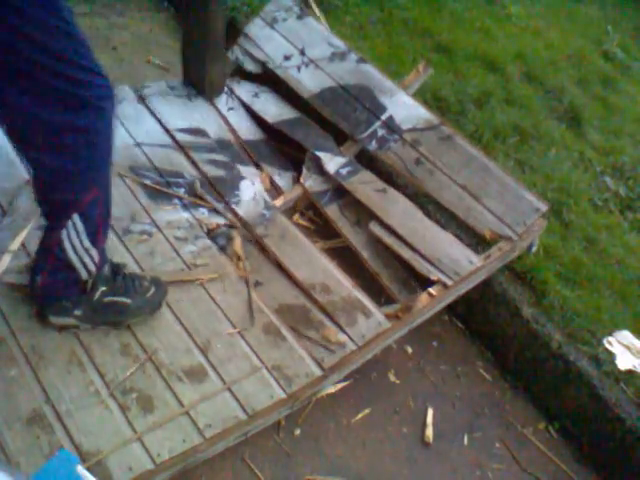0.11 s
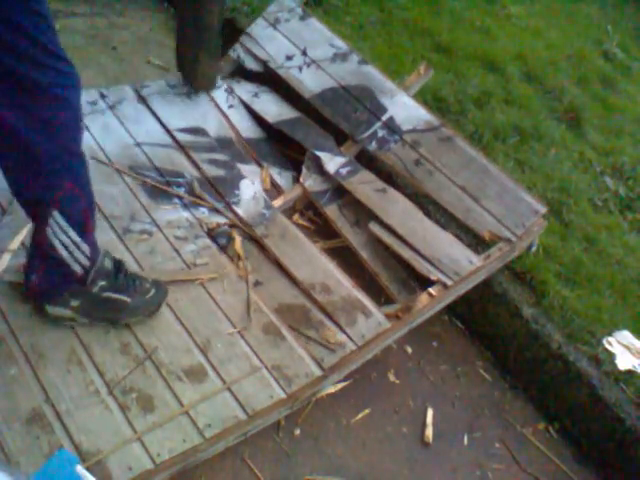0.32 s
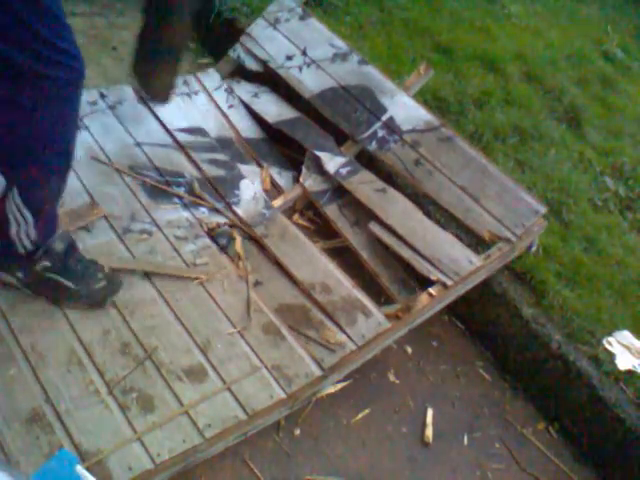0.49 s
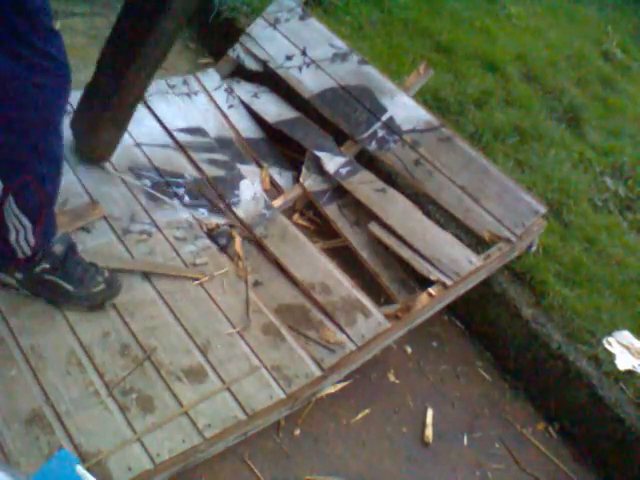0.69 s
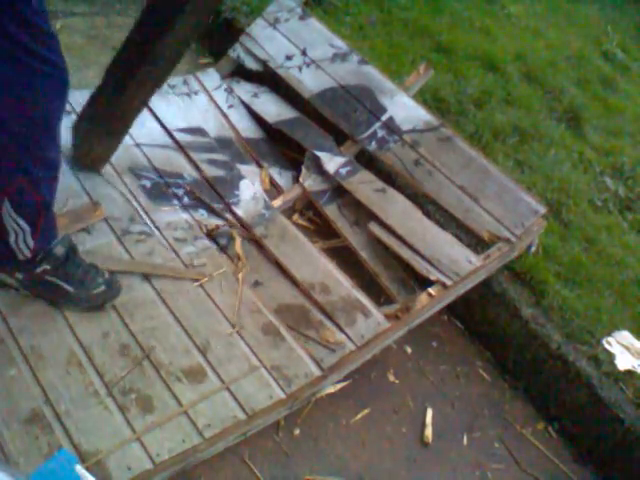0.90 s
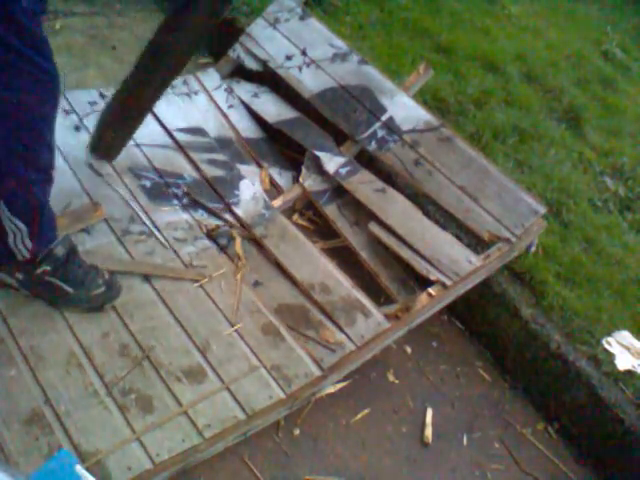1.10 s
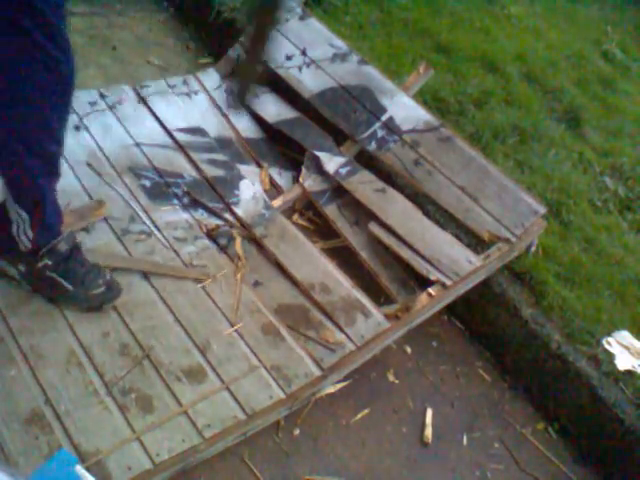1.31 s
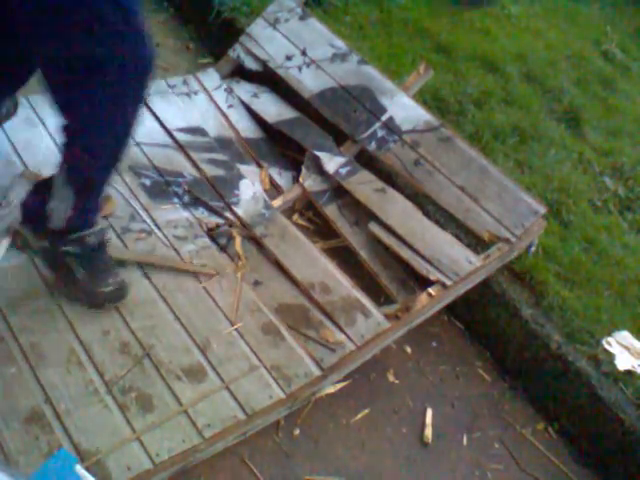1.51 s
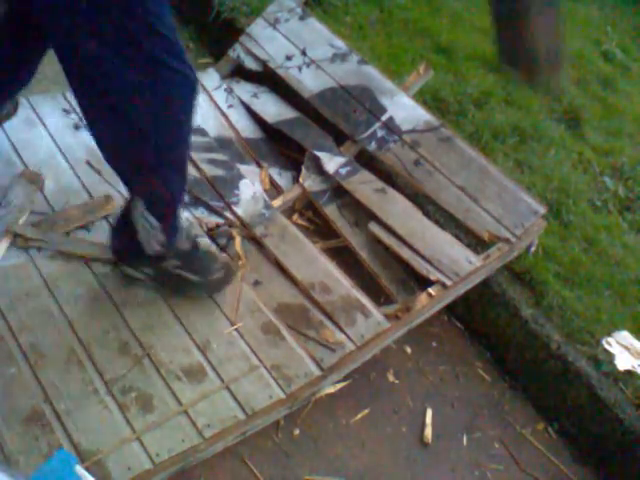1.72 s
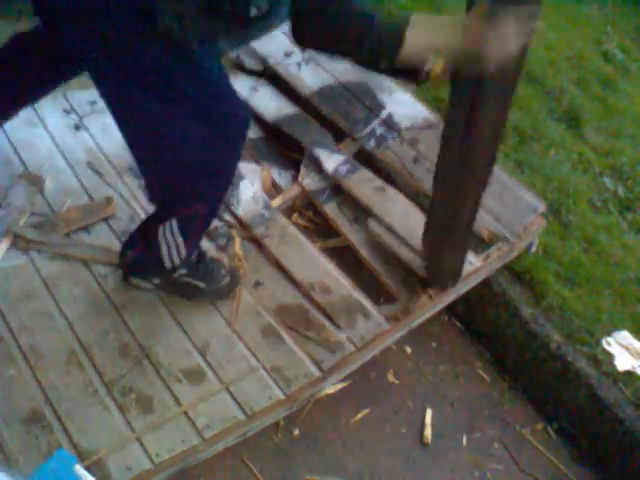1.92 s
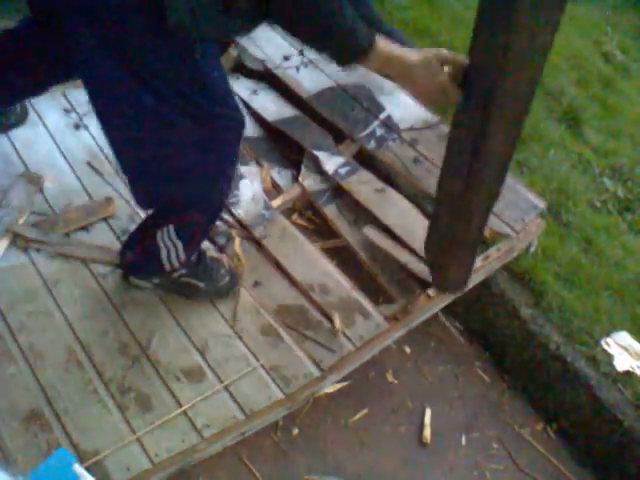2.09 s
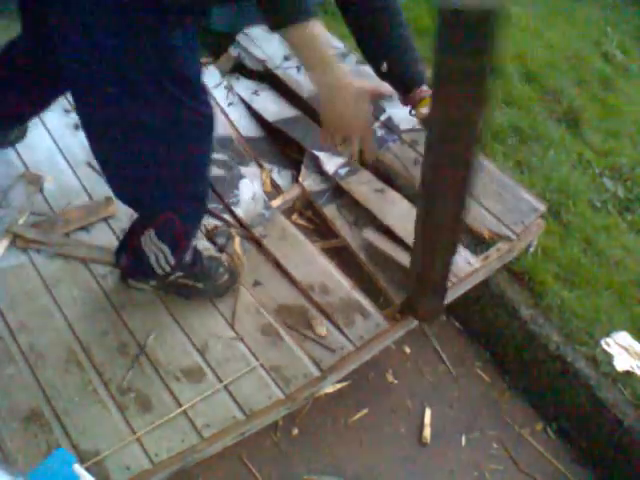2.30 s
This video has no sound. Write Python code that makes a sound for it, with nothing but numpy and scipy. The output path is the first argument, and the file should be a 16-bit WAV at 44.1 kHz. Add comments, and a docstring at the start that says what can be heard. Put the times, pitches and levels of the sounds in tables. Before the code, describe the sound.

Wooden boards crack and splinter under three heavy blows, with low thuds and loose pieces rattling outdoors

```python
"""Fence boards lying on pavement break under three heavy blows: resonant noise and brief ringing fragments make
the splintering, and damped panel modes the boom. Loose pieces knock as short cracks and rattle as coloured noise.
Low damped swings are the thuds of blows and steps; swelling noise is feet scuffing on the boards. Wind rumbles
on the microphone as slowly varying low noise, over a steady hiss, and the input overloads."""
import sys
import numpy as np
from scipy import signal
from scipy.fft import rfft, irfft, next_fast_len
from scipy.io import wavfile
from scipy.ndimage import uniform_filter1d, map_coordinates

SR = 44100
rng = np.random.default_rng(int(sys.argv[2]) if len(sys.argv) > 2 else 0)


def store_wav(level_fs):
    """Save 16-bit WAV to argv[1]."""
    pcm = np.round(np.clip(np.atleast_2d(level_fs), -1, 1) * 32767)
    wavfile.write(sys.argv[1], SR, pcm.T.astype(np.int16))


def rack_gain(trim_db):
    """Turn a fader trim in dB into the linear factor to multiply a signal by."""
    fader = np.asarray(trim_db, float)
    return 10 ** (fader / 20)


N = 110250  # samples

# All spectra are relative: the noise they colour is brought to rms 1 afterwards.
# Wind strength before gusts: (time [s], level [dB])
WIND_LEVEL = [(0.0, -53), (0.44, -42), (0.65, -46.5), (0.99, -38.5), (1.32, -50), (1.5, -54.5),
              (2.19, -36.5), (2.5, -53)]
# Wind rumble spectrum: (frequency [Hz], density [dB per Hz])
WIND_SPECTRUM = [(12, -28), (20, 7.5), (97, -2.5), (130, -13.5), (162, -19), (250, -21), (320, -55),
                 (550, -120)]
# Hiss spectrum: (frequency [Hz], density [dB per Hz])
HISS_SPECTRUM = [(88, -28.5), (150, -3), (280, -19), (960, -12), (1040, -17.5), (5050, -27), (14800, -25),
                 (16000, -36.5)]
# Debris settling between the hits, one list per stretch, relative level: (time [s], level [dB])
DEBRIS_LEVEL = [
    [(0.0, -55.5), (0.23, -69.5)],
    [(0.4, -33.5), (0.42, -35), (0.478, -41.5), (0.532, -40.5), (0.664, -39.5), (0.82, -72)],
    [(0.97, -66), (1.018, -40.5), (1.246, -58.5), (1.308, -68.5), (1.556, -66.5), (1.69, -70)],
    [(1.8, -65.5), (1.912, -62), (1.998, -55), (2.09, -69)],
    [(2.22, -77), (2.274, -30), (2.384, -31.5), (2.5, -43.5)],
]
# Debris spectrum: (frequency [Hz], density [dB per Hz])
DEBRIS_SPECTRUM = [(71, -34), (120, 2.5), (196, -4.5), (246, -1.5), (327, -7), (493, -3.5), (773, -11),
                   (2020, -8.5), (16000, -46)]
# Ground thuds under blows and steps: (time [s], level [dB], settled pitch [Hz], t60 [s])
GROUND_THUDS = [(.005, -33.5, 40, 0.2), (0.247, -14, 50, 0.088), (0.291, -16, 65, 0.32),
                (0.519, -34, 50, 0.093), (0.597, -23.5, 45.2, .2), (0.698, -32, 45, 0.14),
                (0.759, -37.5, 60, 0.1), (0.872, -17.5, 54, 0.44), (1.048, -35, 50, 0.5),
                (1.36, -39.5, 70, 0.16), (1.502, -32, 59.1, 0.088), (1.713, -7, 58.3, 0.041),
                (1.75, -25, 40, 0.18), (1.821, -30.5, 40, 0.11), (1.916, -31.5, 48, .15),
                (1.971, -35, 49.25, 0.23), (2.029, -38, 35.54, 0.26), (2.135, -3.5, 84.6, 0.12),
                (2.226, -15, 80, 0.14), (2.288, -29.5, 70, 0.9), (2.37, -36.5, 82, 0.81)]
# Soles on the boards: (middle [s], half length to 1/e [s], dull rub level [dB], grit level [dB])
SOLE_STROKES = [(.04, 0.019, -58.5, -52.5), (0.212, 0.015, -64.5, -65), (.78, 0.028, -63, -66.5),
                (1.265, .03, -58.5, -65.5), (1.367, 0.0088, -67, -65), (1.538, 0.027, -58, -63),
                (1.727, 0.013, -43.5, -54), (1.766, 0.023, -42, -54.5), (1.827, 0.025, -53.5, -65),
                (1.936, 0.005, -57.5, -54.5), (1.976, .025, -47.5, -58), (2.036, .015, -49.5, -61.5),
                (2.081, 0.022, -47, -54)]
# Dull rub spectrum: (frequency [Hz], density [dB per Hz])
RUB_SPECTRUM = [(88, -51), (150, -7), (254, 0.5), (494, -4), (790, -22), (1120, -13.5), (2140, -31.5),
                (4320, -38), (16000, -37.5)]
# Grit spectrum: (frequency [Hz], density [dB per Hz])
GRIT_SPECTRUM = [(410, -31), (700, 4), (2630, 0), (4610, -17.5), (13300, -28), (14800, -22), (16000, -23)]
# Boards giving way and loose pieces landing, relative levels:
# (time [s], crack level [dB], treble tilt [dB per octave], panel level [dB], panel pitch [Hz])
SHORT_CRACKS = [(.128, -56.5, 3.5, -71, 294), (0.2496, 0, 2.5, -27, 423), (.44, -41, 5.5, -54, 400),
                (.544, -46.5, 6.5, -38, 300), (0.683, -49, 9, -38.5, 391), (0.843, -24.5, 7.5, -37, 391),
                (.888, -20.5, -5, -40, 400), (0.951, -33, -2, -25, 394), (0.999, -59, -0.5, -30, 286),
                (1.018, -43, -3, -14, 245), (1.0276, -38, -0.5, -53, 299), (1.059, -38, -1, -32, 403),
                (1.113, -40.5, -2.5, -42, 390), (1.139, -43.5, -3, -30.5, 280), (1.188, -60, -8, -41, 311),
                (1.24, -55.5, -4.5, -43, 410), (1.325, -67.5, 5.5, -78, 300), (1.712, -45, 0.5, -27.5, 460),
                (1.757, -46.5, -5, -42.5, 470), (1.958, -52, -7, -34, 362), (2.029, -56, -5.5, -27, 293),
                (2.064, -61, 3.5, -29, 480), (2.112, -14.5, 2, -33, 330), (2.238, -25.5, 1, -26, 290),
                (2.351, -31, 6.5, -26, 510), (2.466, -51.5, 6, -49, 403)]
# Splintering wood spectrum: (frequency [Hz], density [dB per Hz])
WOOD_SPECTRUM = [(180, -30.5), (300, -5.5), (425, 4), (502, -2), (814, -6), (1640, -8.5), (3130, -7),
                 (5160, -19), (11900, -33), (16000, -40)]
# Reference decay of splintering, scaled by a share for each crack: (frequency [Hz], t60 [s])
WOOD_DECAY = [(300, 0.36), (1100, 0.35), (3000, 0.32), (8000, 0.31), (15000, 0.3)]
# Board resonances: (centre [Hz], width [Hz], gain [dB])
BOARD_RESONANCES = [(874, 40, 2.5), (1059, 26, 3), (1167, 17, 7), (1425.5, 30, 6.5), (1500, 30, 1),
                    (1651, 10, 9.5), (1820, 45, 4), (2303, 53, 6.5), (2554, 26, 2), (3090, 40, -1.5),
                    (3288, 32, 4.5), (3344, 13, 2)]
# Panel modes before scatter: (frequency [Hz], relative level [dB], t60 [s])
PANEL_MODES = [(135, -6, .14), (172, -5, .13), (224, 0, .13), (283, 0, .12), (370, -6, .12), (426, 0, .15),
               (508, -4, .12), (650, -7, .1)]
# Boards breaking, at each blow and again as the pieces give way: (time [s], relative splintering level [dB],
# hold [s], share of WOOD_DECAY [1], treble tilt [dB per octave], central splinter pitch [Hz])
BREAKS = [(.2445, -5.5, 0.022, 0.86, 1.5, 1388), (.4, -40.5, .05, 0.33, 1.5, 3500),
          (0.837, -16.5, 0.027, 0.75, -1.5, 2230), (0.871, -22, 0.022, .25, -1, 2600),
          (2.105, -5, 0.013, 0.94, 1.33, 2365), (2.29, -29.5, 0.033, 0.45, 0, 2000),
          (2.354, -25.5, 0.017, .35, -2.5, 1300)]
# Panel booming under the blows: (time [s], relative level [dB], most driven pitch [Hz], contact push [s])
PANEL_BOOMS = [(0.2433, -14, 406, 0.054), (0.299, -20.5, 140, .04), (.838, 1, 262.2, 0.016),
               (2.106, -16.5, 421, 0.026), (2.149, -12.5, 165, .03)]


def unit(x):
    """Normalisation: division by the root mean square gives rms 1."""
    return x / np.sqrt(np.mean(x ** 2) + 1e-20)


def along(points, hz):
    """Logarithmic frequency scale: (Hz, value) points joined by straight lines."""
    f, v = np.transpose(points)
    return np.interp(np.log(hz + 1), np.log(f + 1), v)


def curve(rows):
    """Linear interpolation: (s, value) rows give one value per sample."""
    s, v = np.transpose(rows)
    return np.interp(np.arange(N) / SR, s, v)


def wobble(rate):
    """Spline interpolation: random knots, rate of them a second, make a smooth curve."""
    knots = rng.standard_normal(400)
    return map_coordinates(knots, [np.arange(N) * rate / SR])


def coloured(x, points):
    """Linear filtering: x takes on a (Hz, dB) spectrum, at rms 1."""
    m = next_fast_len(len(x) + 8192)
    gain = rack_gain(along(points, np.fft.rfftfreq(m, 1 / SR)))
    return unit(irfft(rfft(x, m) * gain, m)[:len(x)])


def snaps(size, share):
    """Impulsive excitation: sparse snaps of uneven strength over a bed of white noise."""
    hit = rng.random(size) < .05
    strength = rack_gain(2.5 * rng.exponential(size=size).clip(0, 3))
    sparse = unit(hit * rng.standard_normal(size) * strength)
    return share * sparse + rng.standard_normal(size)


def add(out, s, x):
    """Superposition: x is summed into out from time s."""
    part = out[round(s * SR):][:len(x)]
    part += x[:len(part)]


def wind():
    """Turbulent pressure: low noise whose level wanders in gusts."""
    gust_db = 4 * wobble(29)
    return rack_gain(curve(WIND_LEVEL) + gust_db) * coloured(rng.standard_normal(N), WIND_SPECTRUM)


def hiss():
    """Stationary noise: a fixed spectrum at constant level."""
    return rack_gain(-70.5) * coloured(rng.standard_normal(N), HISS_SPECTRUM)


def rattle():
    """Many small impacts: fine debris and grit as snapping noise in uneven clumps."""
    level_db = curve(np.concatenate(DEBRIS_LEVEL)) - 4.0 + 0.88 * wobble(30)
    return rack_gain(level_db) * coloured(snaps(N, share=0.57), DEBRIS_SPECTRUM)


def thuds():
    """Damped oscillation: landing weight sets off a low swing whose pitch sags."""
    out, t = np.zeros(N), np.arange(SR // 2) / SR
    sagging_t = t + .004 * (1 - np.exp(-t / .03))  # runs fast at first, so the pitch starts high
    onset = 1 - np.exp(-t / 0.0013)
    for s, db, hz, t60 in GROUND_THUDS:
        swing = np.sin(2 * np.pi * hz * sagging_t)
        add(out, s, -rack_gain(db - 60 * t / t60) * swing * onset)
    return out


def scuffs():
    """Sliding friction: strokes of dull rub and grit under the sole swell and fade."""
    t = np.arange(N) / SR
    rub, grit = np.zeros(N), np.zeros(N)
    for s, half, rub_db, grit_db in SOLE_STROKES:
        stroke = np.exp(-((t - s) / half) ** 2)
        rub += rack_gain(rub_db) * stroke
        grit += rack_gain(grit_db) * stroke
    rub = rub * coloured(snaps(N, share=0.91), RUB_SPECTRUM)
    grit = grit * coloured(snaps(N, share=0.66), GRIT_SPECTRUM)
    return rack_gain(0.61 * wobble(64)) * (rub + grit)


def splinters(size, centre_hz):
    """Free vibration: fragments of scattered pitch and size ring for a few cycles."""
    spread_octaves, ring_cycles = .6, 7  # 30 dB of decay in ring_cycles
    dull_db = 18  # loss per octave above 3 kHz
    count = size // 70
    start = (rng.random(count)[:, None] * size).astype(int)
    hz = centre_hz * 2 ** (spread_octaves * rng.standard_normal(count)[:, None])
    weight_db = 2 * rng.exponential(size=count).clip(0, 3)[:, None]
    k = np.arange(400)
    cycles = hz * k / SR
    dulling_db = dull_db * np.log2(np.maximum(hz / 3000, 1))
    level = rack_gain(weight_db - dulling_db - 30 * cycles / ring_cycles)
    grains = level * np.sin(2 * np.pi * cycles) * (1 - np.exp(-cycles))
    return unit(np.bincount((start + k).ravel(), grains.ravel(), size)[:size])


def through_board(x):
    """Resonance: the board's modes stand out of whatever shakes it."""
    f = np.fft.rfftfreq(2 * len(x), 1 / SR)
    gain = 1
    for c, width, db in BOARD_RESONANCES:
        gain = gain + (rack_gain(db) - 1) * 1j * f * width / (c * c - f * f + 1j * f * width)
    return unit(irfft(rfft(x, 2 * len(x)) * gain)[:len(x)])


def crack(hold_s, tilt_db, shorter, splinter_hz, size):
    """Fracture noise: splintering holds, then dies at a rate set by frequency, in patches."""
    attack_s, splinter_share, patch_db = 0.0012, .9, 1.7
    fibres = coloured(snaps(size, share=0.67), WOOD_SPECTRUM)
    fibres = fibres + splinter_share * splinters(size, splinter_hz)
    hz, t, z = signal.stft(through_board(fibres), SR, nperseg=128)
    patches = uniform_filter1d(rng.standard_normal(z.shape), size=3, axis=0)  # across frequency
    patches = unit(uniform_filter1d(patches, size=5, axis=1))  # and along time
    hz = hz[:, None]
    tilt = tilt_db * np.log2((hz + 100) / 2000)
    decay = 60 * np.maximum(t - hold_s, 0) / (shorter * along(WOOD_DECAY, hz))
    db = tilt - decay + patch_db * patches
    x = signal.istft(z * rack_gain(np.clip(db, -150, 40)), SR, nperseg=128)[1][:size]
    return x * (1 - np.exp(-np.arange(size) / SR / attack_s)) ** 2


def panel(centre_hz, push_s, size):
    """Modal excitation: modes near a pitch sound while the contact pushes, then decay."""
    drive_octaves = 0.6  # how widely a contact drives the modes
    scatter_db, attack_s = 5, .004
    t = np.arange(size) / SR
    ring = np.zeros(size)
    for hz, db, t60 in PANEL_MODES:
        level_chance, pitch_chance = rng.random(2)
        scattered_db = db + scatter_db * (level_chance - 2.0)
        off_pitch_db = 4.3 * (np.log2(hz / centre_hz) / drive_octaves) ** 2
        decay_db = 60 * np.maximum(t - push_s, 0) / t60
        scattered_hz = hz * (1 + .03 * (pitch_chance - .5))
        ring += rack_gain(scattered_db - off_pitch_db - decay_db) * np.sin(2 * np.pi * scattered_hz * t)
    return ring * (1 - np.exp(-t / attack_s))


def knocks():
    """Brief impact: a short crack excites a little of the panel."""
    hold_s, shorter, splinter_hz, size = 0.0027, 0.17, 1550, SR // 8
    out = np.zeros(N)
    for s, db, tilt_db, panel_db, hz in SHORT_CRACKS:
        add(out, s, rack_gain(db) * crack(hold_s, tilt_db, shorter, splinter_hz, size))
        add(out, s, rack_gain(panel_db) * panel(hz, hold_s, size))
    return out


def blows():
    """Fracture under impact: breaking boards splinter and the struck panel booms."""
    out = np.zeros(N)
    for s, db, hold_s, shorter, tilt_db, hz in BREAKS:
        add(out, s, rack_gain(db) * crack(hold_s, tilt_db, shorter, hz, size=SR // 3))
    for s, db, hz, push_s in PANEL_BOOMS:
        add(out, s, -rack_gain(db) * panel(hz, push_s, size=SR // 2))
    return out


def scene():
    """Superposition: all sources add at one microphone."""
    return (wind() + hiss() + rattle() + thuds() + scuffs() + knocks() + blows())[None]


def low_pass(x):
    """Removes everything above the highest recorded frequency."""
    return signal.sosfilt(signal.butter(12, 16670, fs=SR, output="sos"), x)


def record(dry):
    """Saturation and band limiting: the input overloads, then the band ends."""
    ceiling, hardness, top_hz = .73, 6, 15800  # ceiling in full-scale units
    x = dry / (1 + np.abs(dry / ceiling) ** hardness) ** (1 / hardness)
    x = irfft(rfft(x) * (np.fft.rfftfreq(N, 1 / SR) < top_hz), N)
    return low_pass(x)


dry = scene()
out = record(dry)
store_wav(out)
```